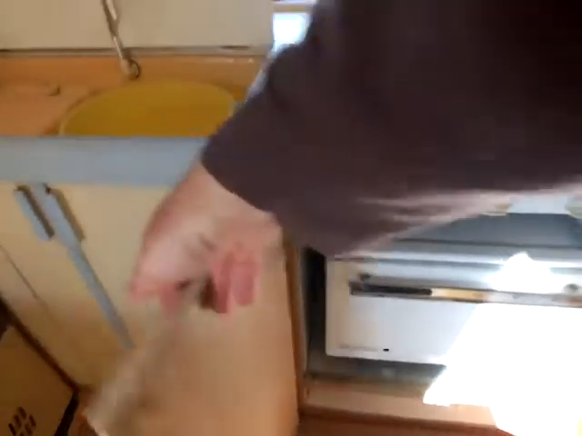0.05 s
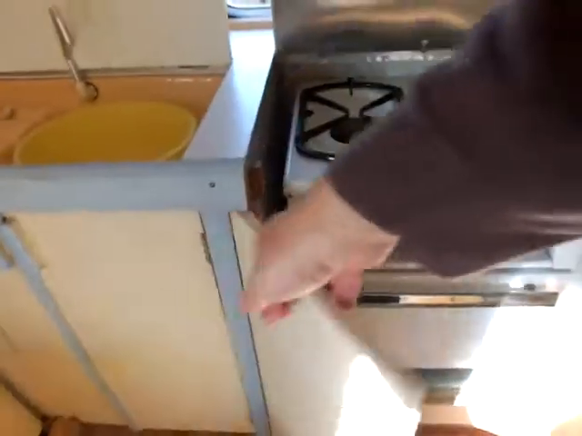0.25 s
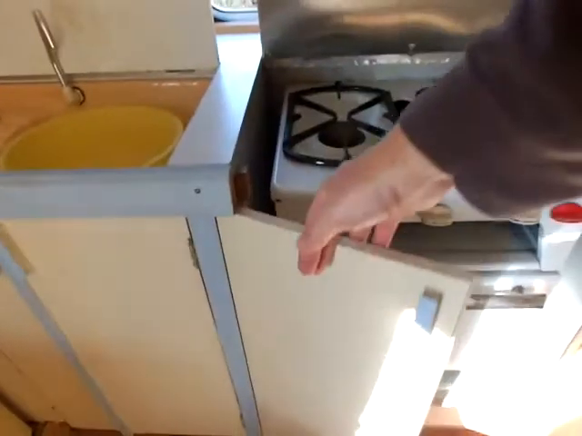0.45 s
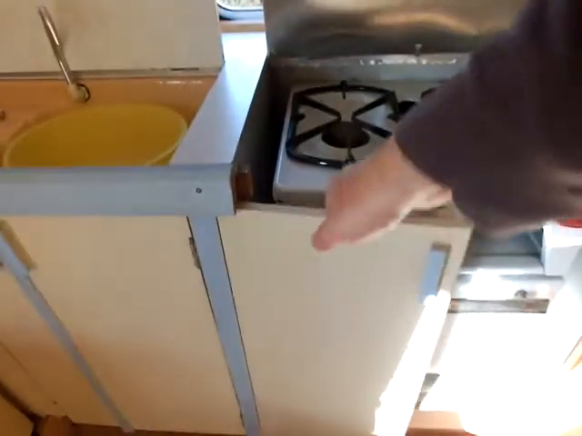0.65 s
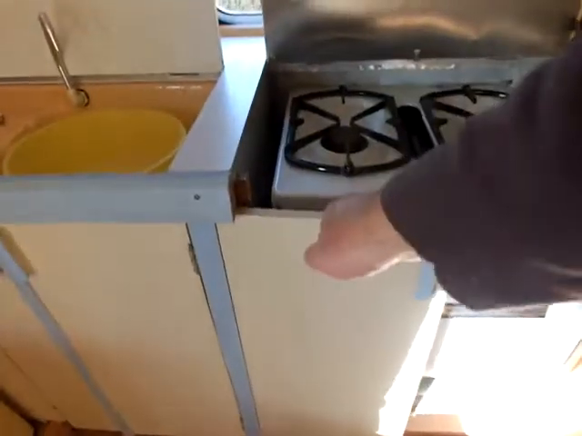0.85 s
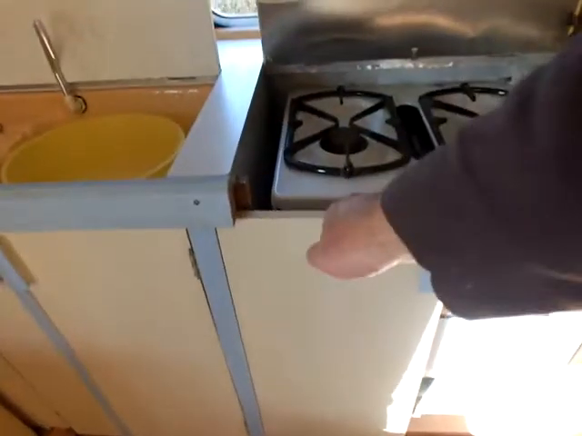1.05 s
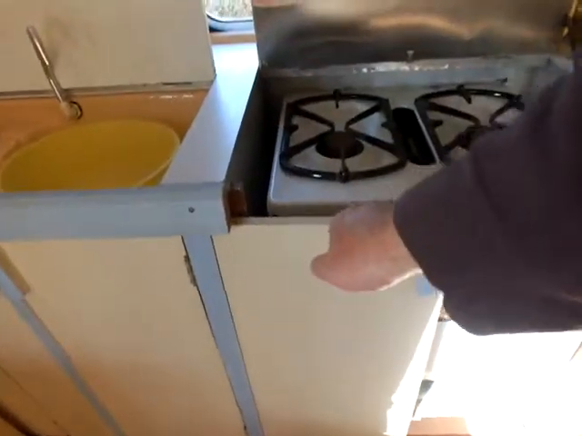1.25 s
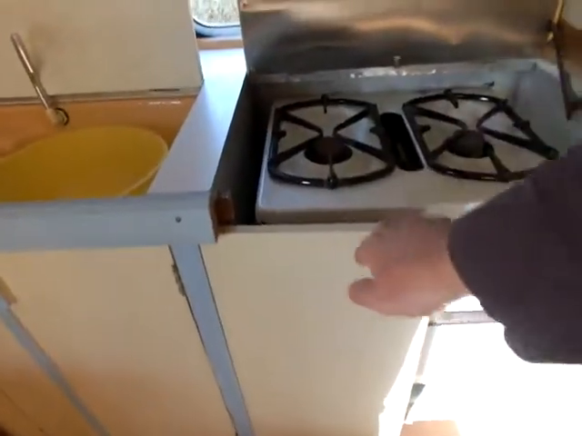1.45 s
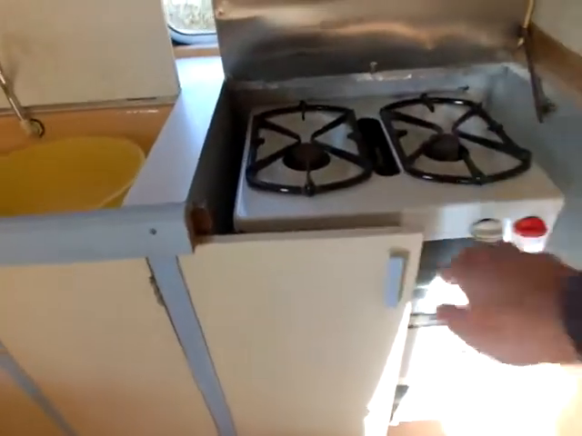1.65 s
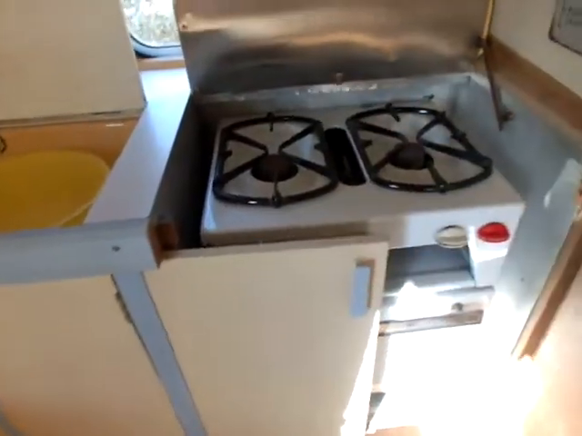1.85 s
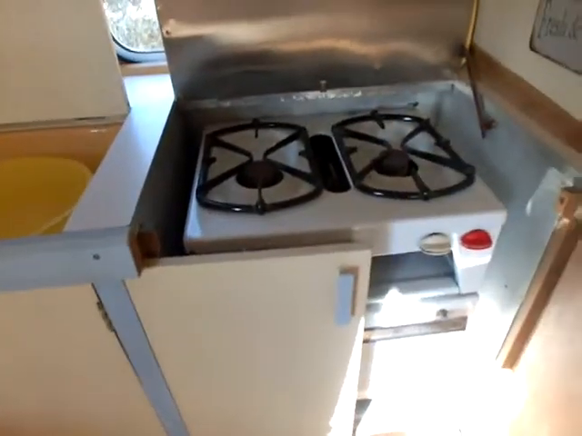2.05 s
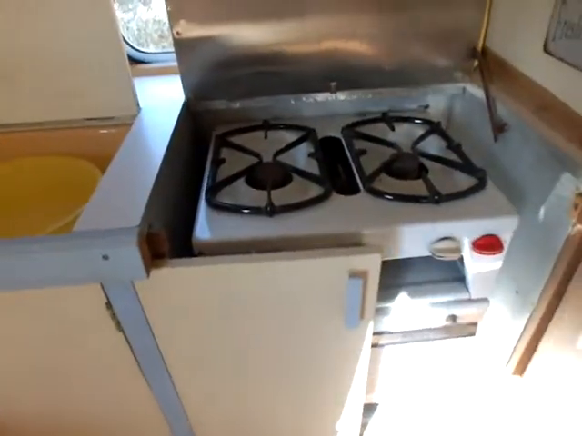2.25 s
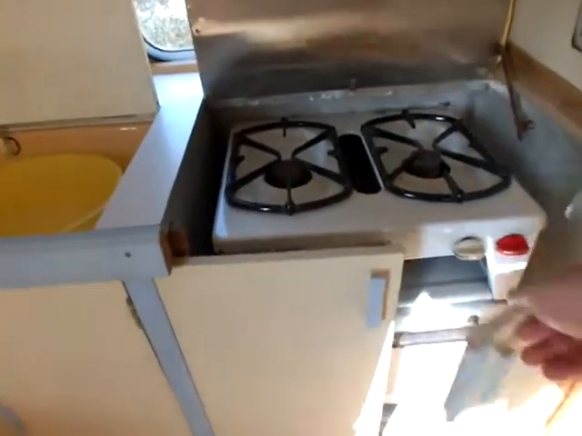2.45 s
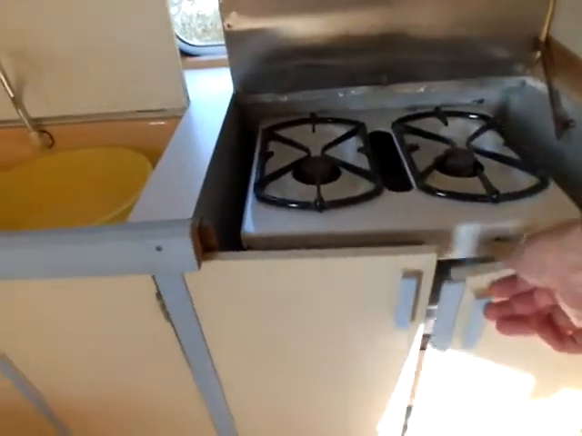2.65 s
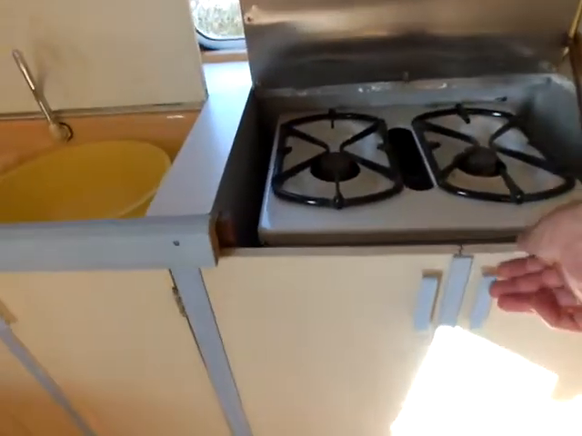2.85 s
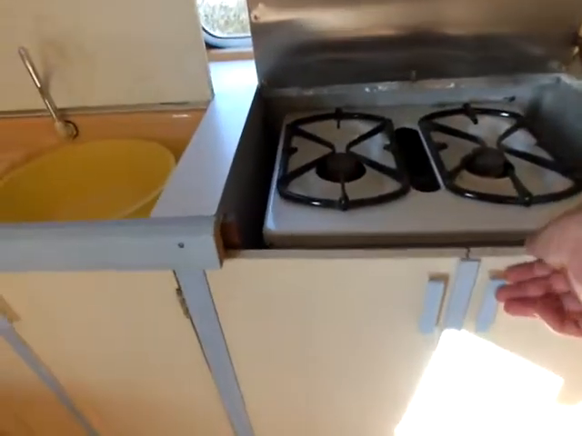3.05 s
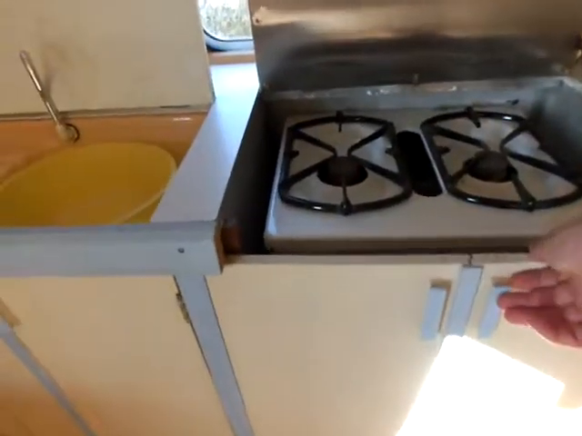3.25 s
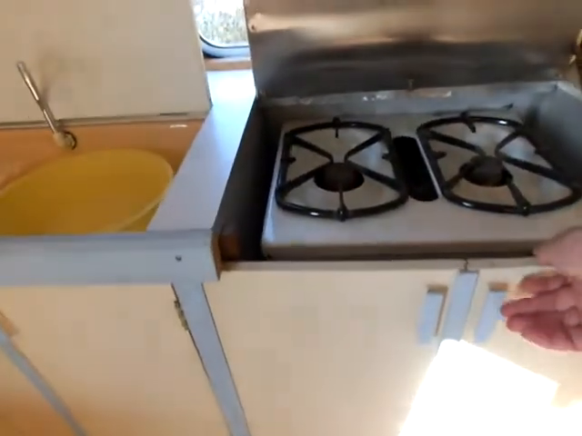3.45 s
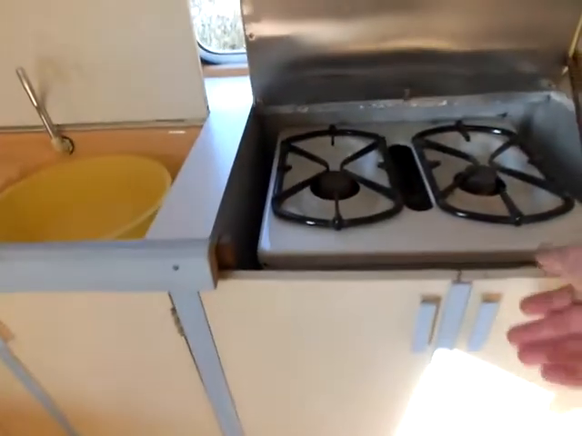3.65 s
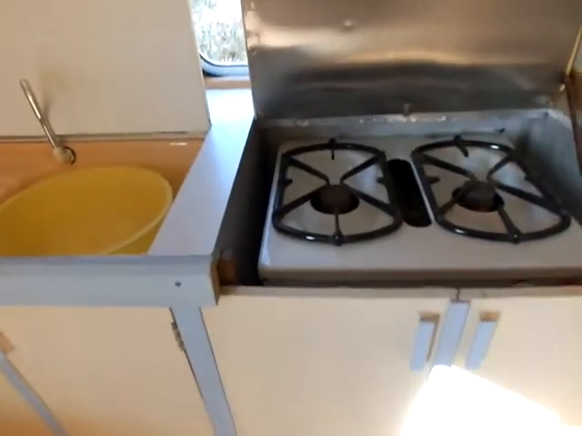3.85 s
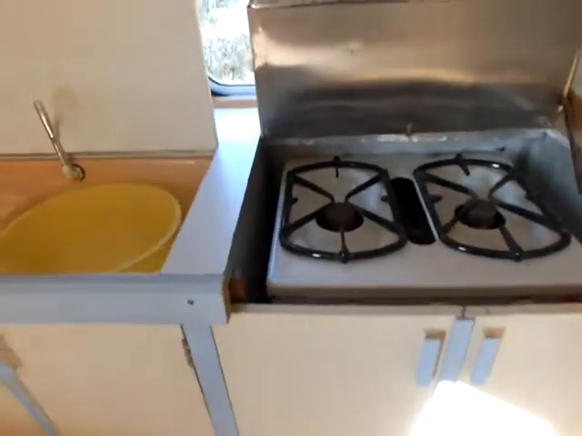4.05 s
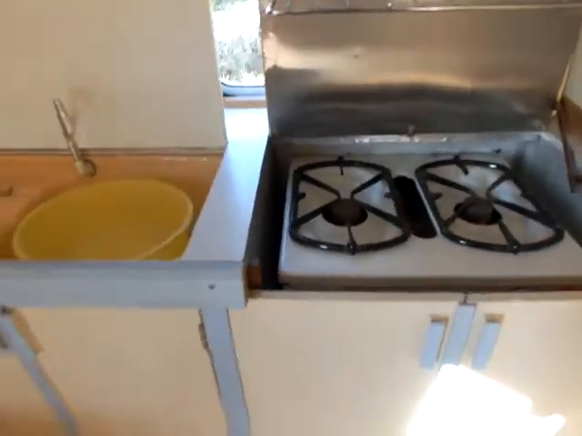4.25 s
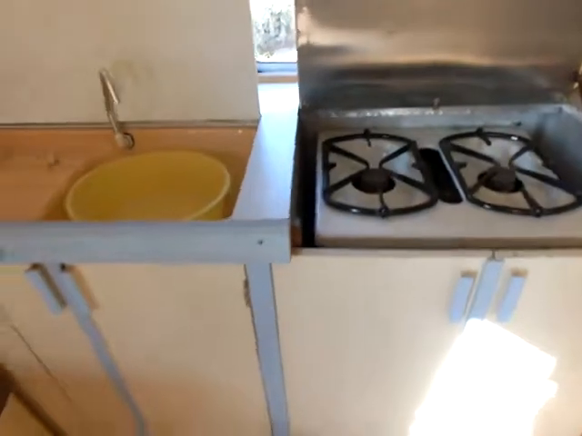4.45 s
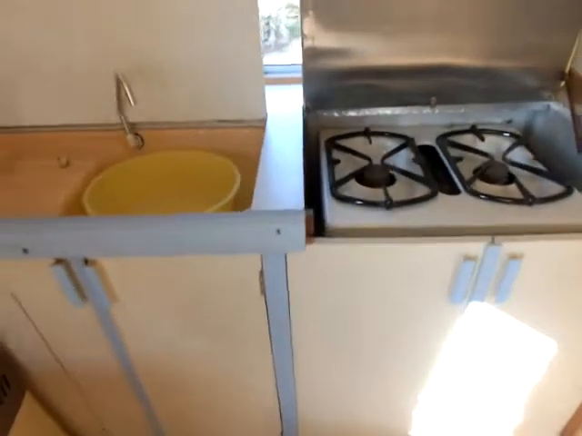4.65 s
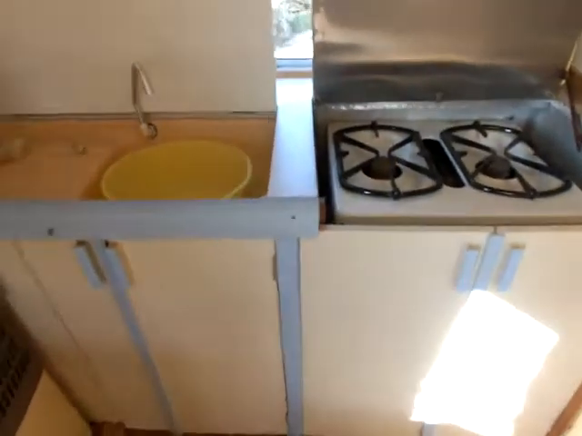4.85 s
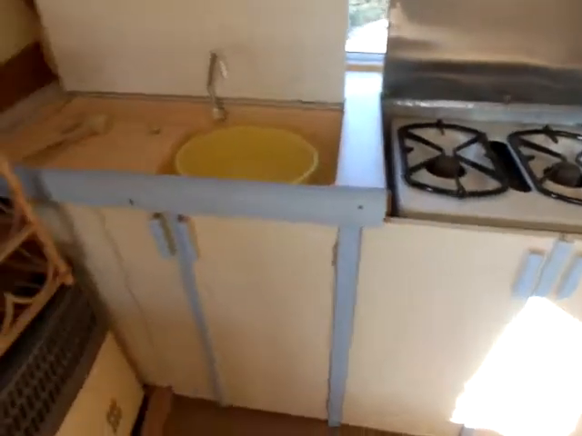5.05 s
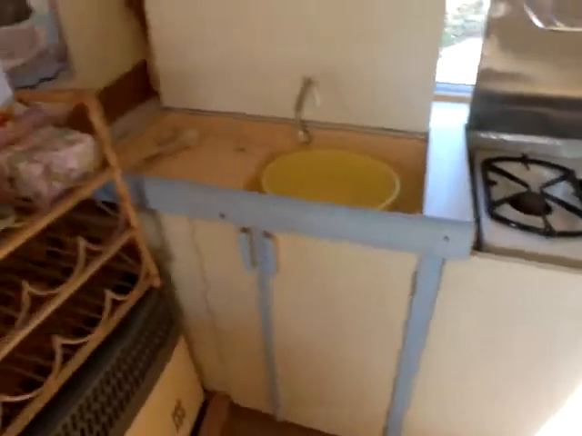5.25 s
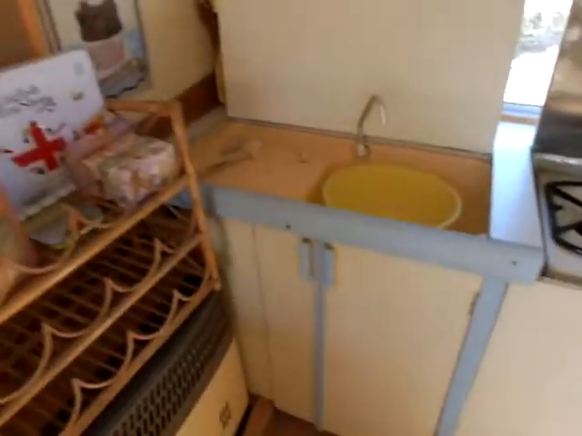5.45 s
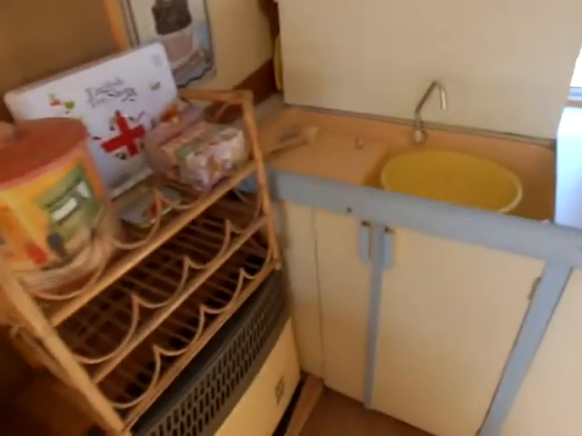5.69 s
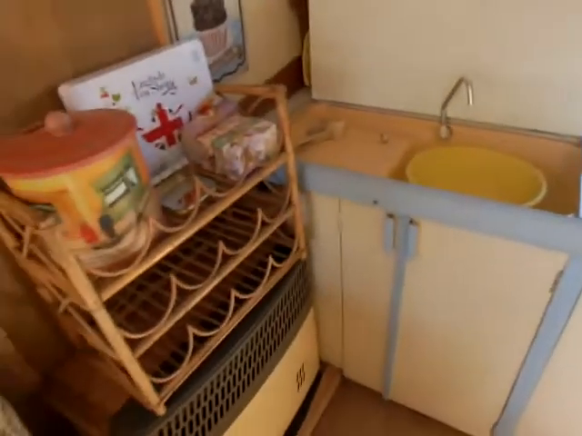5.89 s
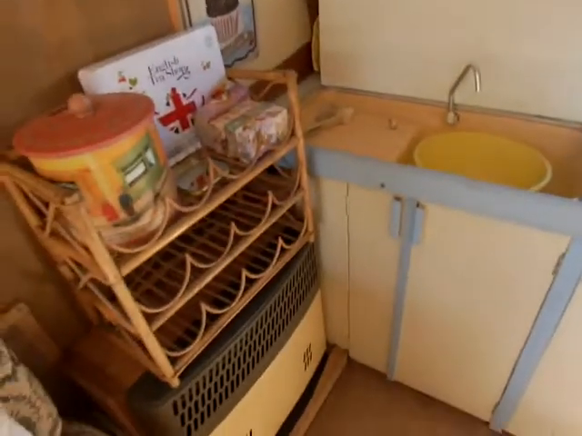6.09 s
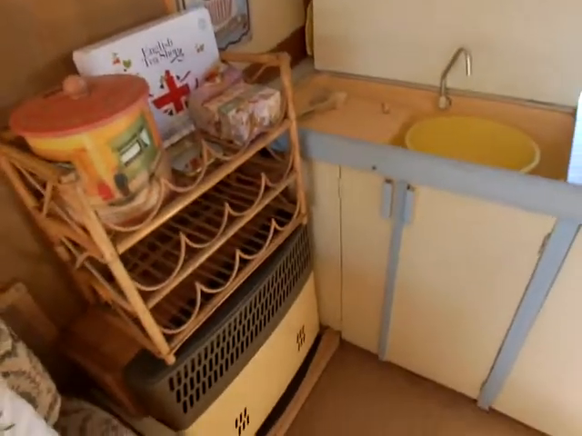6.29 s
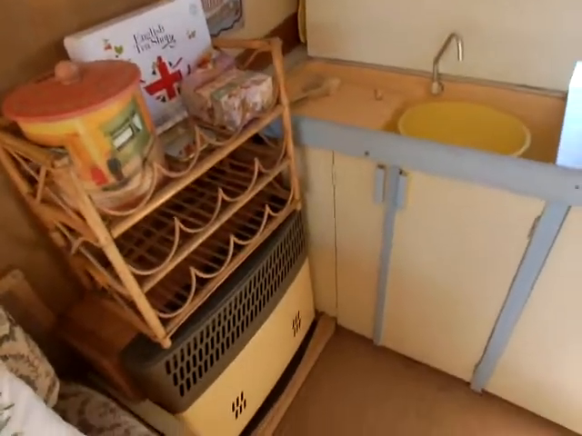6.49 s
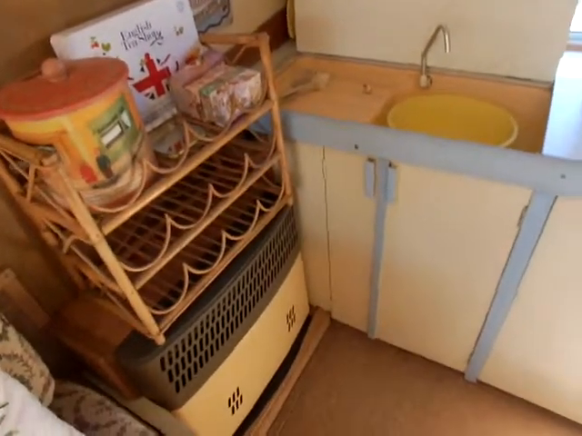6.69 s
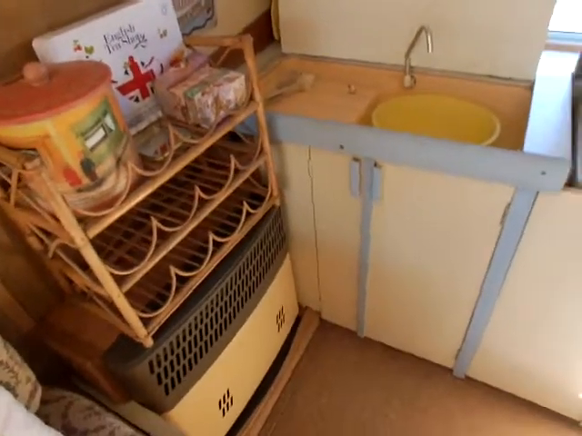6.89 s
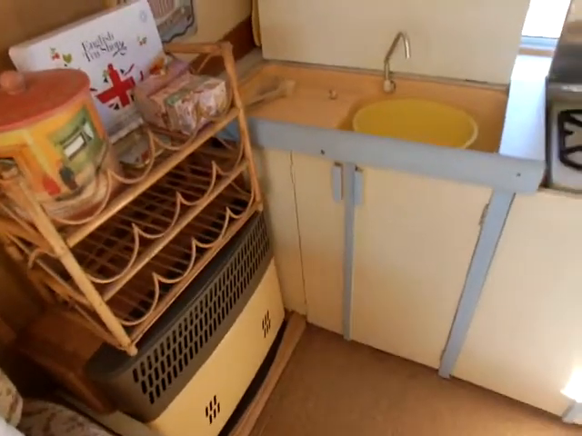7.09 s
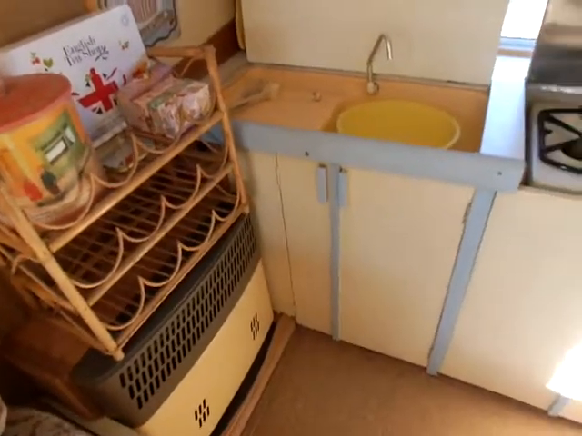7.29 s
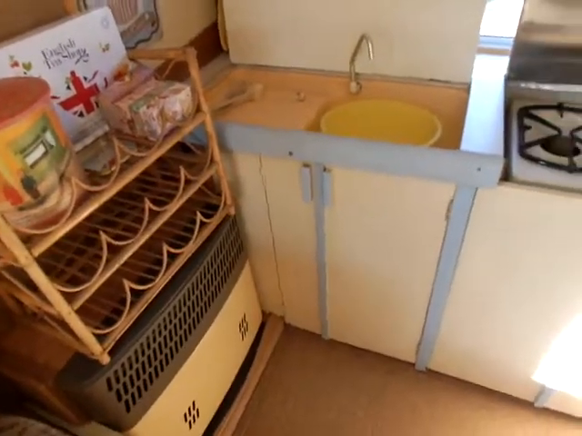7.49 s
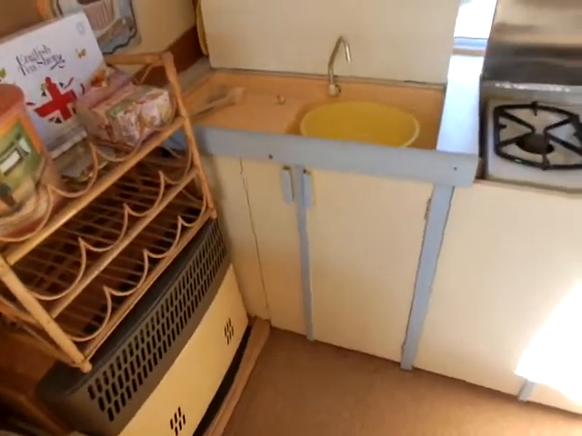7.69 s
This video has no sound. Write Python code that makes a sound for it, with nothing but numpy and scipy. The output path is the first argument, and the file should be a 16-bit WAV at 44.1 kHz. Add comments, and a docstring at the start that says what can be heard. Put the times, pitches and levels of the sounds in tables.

```python
"""Caravan cupboard doors

Two plywood doors under a stove are pushed shut by hand: the left bangs and rebounds, the right shuts in one main knock.
Each blow is shaped noise (crack, clatter) plus decaying sines for the door panel and, faintly, the stove.
Filtered noise makes the hinges, taps, sleeve ticks, rubbing, scuffs and rustle; two dry snaps and a bumped door also ring.
The small furnished cabin answers briefly; a hand-held camera listens over a soft steady rush with a thin whine."""
import sys
import numpy as np
from scipy import signal
from scipy.fft import rfft, irfft, next_fast_len
from scipy.io import wavfile
from scipy.ndimage import uniform_filter1d, map_coordinates

SR = 44100
rng = np.random.default_rng(int(sys.argv[2]) if len(sys.argv) > 2 else 0)


def transcribe(signal):
    """Save signal, clipped to [-1, 1], as a 16-bit WAV file at the path in sys.argv[1]."""
    frames = np.atleast_2d(signal).T
    limited = np.clip(frames, -1, 1)
    pcm = np.round(limited * 32767).astype(np.int16)
    wavfile.write(sys.argv[1], SR, pcm)


N = 340893
T_S = np.arange(SR) / SR
FREQ_HZ = np.fft.rfftfreq(SR, 1 / SR)
SIDES = np.array([[.5], [-.5]])  # left, right
TOP_HZ = 15850

# All event and mode levels are relative, before the mix gains.
# cabin rush, spectrum shape: (frequency [Hz], density [dB per Hz])
AIR_SPECTRUM = [(15, -42.5), (25, -11), (55, -7.5), (86, -8.5), (144, -6.5), (253, -3.5), (297, -6),
                (399, -5.5), (1270, -12), (1710, -14), (2630, -16.5), (11200, -31), (15500, -38.5)]
# rush level: (time [s], level [dB])
AIR_LEVEL = [(0, -53), (1.8, -52), (3.6, -51.5), (5.5, -51), (6.5, -53.5), (7.7, -54)]
# left-right likeness of the rush: (frequency [Hz], correlation [-])
AIR_ALIKE = [(60, 0.52), (180, 0.08), (550, 0.23), (1650, 0.097), (4970, 0.045), (15000, 0.2)]
# left-right likeness of all other sounds: (frequency [Hz], correlation [-])
HIT_ALIKE = [(100, 0.99), (400, 0.99), (750, 0.85), (1400, 0.84), (2800, 0.31), (6000, 0.027)]
# balance of all but the air: (frequency [Hz], left minus right [dB])
LEAN = [(100, 1.3), (1400, 0), (2800, -2), (6000, -1), (12000, -4.5)]

# clothes' rustle while turning away: (time [s], level [dB])
RUSTLE_LEVEL = [(4, -67), (4.55, -53.5), (4.85, -62), (5.35, -58), (6.1, -65), (6.43, -58), (6.7, -66)]
RUSTLE_EDGE_HZ, RUSTLE_FALL_DB_PER_OCT = 1860, 9
# hand slides over a door: (peak time [s], rise [s], level [dB], low edge [Hz])
RUBS = [(0, 0.17, -51.5, 101), (.685, 0.045, -47.5, 2200), (1.42, 0.053, -52, 865),
        (2.355, .035, -53, 2000), (2.48, 0.087, -55, 1800), (3.735, .018, -52.5, 700)]
RUB_FALL_PER_RISE, RUB_FALL_DB_PER_OCT = 1.7, 5  # the first is fall time over rise time
# shoes scuff on the floor: (peak time [s], level [dB])
SCUFFS = [(5.463, -53), (5.575, -52.5)]
SCUFF_S, SCUFF_EDGE_HZ, SCUFF_FALL_DB_PER_OCT = 0.025, 1840, 27

# dull thuds through the floor: (time [s], level [dB], low edge [Hz])
THUDS = [(1.374, -52.5, 90), (2.085, -44, 50), (5.304, -51.5, 35)]
THUD_FALL_DB_PER_OCT, THUD_CUT_HZ, THUD_T60_S = 6.5, 310, 0.99
# soft knocks on the woodwork; the faint bright ones at 4.93 and 5.963 s are ticks of a creasing sleeve:
# (time [s], level [dB], low edge [Hz])
SOFT_TAPS = [(3.77, -37.5, 332), (4.042, -40.5, 540), (4.411, -41, 507), (4.93, -51, 2700),
             (5.304, -41.5, 516), (5.485, -44.5, 1590), (5.963, -49, 2100)]
SOFT_TAP_FALL_DB_PER_OCT, SOFT_TAP_CUT_HZ, SOFT_TAP_T60_S = 12.5, 2800, 0.083
# hard clicks of catch and handle: (time [s], level [dB], low edge [Hz], cut-off [Hz])
CLICKS = [(1.379, -35, 5500, 13000), (2.111, -25.5, 1130, 12000), (2.2078, -26.5, 750, 5200),
          (3.448, -35, 900, 15000), (4.607, -45, 6000, 15000)]
CLICK_FALL_DB_PER_OCT = 5
# ring time at the reference level; it doubles with each doubling step in level
CLICK_T60_S, CLICK_REF_DB, CLICK_DOUBLING_DB = .105, -25.5, 11
# dry snaps: (time [s], level [dB], low edge [Hz], cut-off [Hz], t60 [s], ring level [dB])
SNAPS = [(5.8377, -26.5, 4850, 13100, 0.1, -37), (6.6167, -34.5, 5660, 10000, 0.12, -35)]
# ring of the small snapping part: (frequency [Hz], level [dB], t60 [s])
SNAP_MODES = [(1403, -10.5, 0.15), (3570, -6, 0.062), (4200, -8, 0.11), (5430, 7, 0.028),
              (5970, -3.5, 0.087), (7240, 8.5, 0.032), (8500, 1, 0.056), (9800, -1, 0.073),
              (13470, -8, .06)]

# bump on the open door: (time [s], level [dB])
BUMPS = [(1.977, -22.5)]
# modes of the open door: (frequency [Hz], level [dB], t60 [s])
OPEN_DOOR_MODES = [(264, -7, 0.25), (306, -9.5, 0.18), (336, -11, 0.33), (396, -6, 0.089),
                   (466, -4.5, 0.19), (533, 1.5, 0.14), (670, -18, .12), (877, -7.5, 0.17),
                   (1160, -15, .14), (1680, -16, 0.1), (1916, -16, 0.11)]
# left hinge turning: (peak time [s], rise [s], fall [s], level [dB])
LEFT_SWINGS = [(.58, 0.057, 0.067, -54.5), (.68, .025, .07, -41)]
# right hinge turning: (peak time [s], rise [s], fall [s], level [dB])
RIGHT_SWINGS = [(2.44, 0.033, 0.036, -48), (2.602, 0.0071, 0.019, -50), (3.41, 0.018, 0.062, -56.5)]
# left door resonances driven by its hinge: (frequency [Hz], width [Hz], level [dB])
LEFT_HINGE_PEAKS = [(950, 160, -2), (1835, 130, -3.5), (2640, 120, -7), (3150, 110, -10.5), (3540, 37, -7),
                    (4770, 51, -23)]
# right door resonances driven by its hinge: (frequency [Hz], width [Hz], level [dB])
RIGHT_HINGE_PEAKS = [(1110, 39, 1), (1445, 94, -1), (1864, 33, 0), (2740, 60, -4)]

# sheet-metal stove modes: (frequency [Hz], level [dB], t60 [s])
STOVE_MODES = [(232, -41, 1.32), (290, -43, 1.32), (307.3, -51.5, 2.97), (710, -41.5, 0.66),
               (788, -50, 1.37), (1125, -54, 0.8), (1400, -64, .6), (1880, -48, 0.89), (2310, -46, 0.67),
               (2620, -57.5, 0.84)]
# left panel modes: (frequency [Hz], level [dB], t60 [s])
LEFT_DOOR_MODES = [(69.9, -30, 0.69), (106, -23.5, 0.28), (160.3, -23, 0.42), (205.8, -27, 0.55),
                   (222, -25.5, 0.25), (262.6, -16, 0.27), (293, -20.5, 0.21), (321.3, -20, 0.25),
                   (358, -18.5, 0.094), (411.4, -20.5, 0.25), (494, -29, 0.32), (638, -27, 0.26),
                   (862, -27, 0.15), (1170, -42, .2), (1470, -20.5, 0.073), (1597, -21, 0.048),
                   (3106, -19, 0.05)]
# right panel modes: (frequency [Hz], level [dB], t60 [s])
RIGHT_DOOR_MODES = [(60, -29, 0.58), (95.2, -32, 0.54), (106.5, -21.5, 0.26), (208.5, -18.5, 0.31),
                    (234, -22, 0.44), (308.7, -17.5, 0.26), (335, -16.5, .29), (435, -45, .2),
                    (436, -23.5, 0.2), (555, -19, 0.16), (585, -37, 0.17), (622, -27.5, 0.29),
                    (676, -21.5, 0.25), (728, -33, 0.49), (794, -35.5, 0.64), (915, -39, 0.14),
                    (1070, -30, 0.22), (1237, -18.5, 0.16), (1555, -22.5, 0.099), (1794, -17.5, 0.12),
                    (2210, -25, 0.069), (2355, -26.5, 0.074), (3410, -23, 0.074)]
# left door and frame clatter, spectrum shape: (frequency [Hz], density [dB per Hz])
LEFT_CLATTER = [(35, -49), (60, -16), (291, -6), (533, -11.5), (869, -14.5), (1120, -17.5), (1590, -15.5),
                (2470, -19), (3050, -16), (3500, -19.5), (5840, -21.5), (6870, -29.5), (15500, -30.5)]
# right door and frame clatter, spectrum shape: (frequency [Hz], density [dB per Hz])
RIGHT_CLATTER = [(35, -29), (60, 2.5), (312, -12), (889, -11.5), (1050, -12), (1230, -13), (1380, -13.5),
                 (1830, -13.5), (2200, -12), (3420, -17.5), (5080, -22), (6710, -33.5), (8470, -39),
                 (15500, -50)]
# wood decay at damping 1: (frequency [Hz], t60 [s])
WOOD_DECAY = [(100, 0.7), (300, 0.1), (700, 0.39), (1500, 0.13), (4000, 0.12), (12000, 0.051)]
# cabin decay: (frequency [Hz], t60 [s])
CABIN_DECAY = [(100, 1), (400, 0.91), (2000, 0.45), (5000, 0.3), (12000, 0.2)]
# left door meets its frame and bounces:
# (time [s], level [dB], first flight [s], loss per bounce [dB], cut-off kept per bounce [ratio])
LEFT_STRIKES = [(.7575, -14, .029, 4.5, .55), (.9825, -22, 0.05, 9, 0.025)]
# right door meets its frame and bounces:
# (time [s], level [dB], first flight [s], loss per bounce [dB], cut-off kept per bounce [ratio])
RIGHT_STRIKES = [(2.8695, -8.8, .0535, 17.4, 0.054)]
STRIKE_CUT_HZ, FLIGHT_RATIO = 16000, .53  # first contact's cut-off; each flight over the one before
RING_DB_PER_BLOW_DB = .82  # hard blows clatter more than they ring
# left door chatters in its catch: (time [s], first contact level [dB], cut-off [Hz])
LEFT_RATTLE = [(1.0585, -28, 1600)]
# right door chatters in its catch: (time [s], first contact level [dB], cut-off [Hz])
RIGHT_RATTLE = [(3.014, -39, 3000)]
RATTLE_GAP_S, RATTLE_RISE_S = 0.039, 0.0027
RATTLE_LOSS_DB = 8  # per doubling of the contact count


def amp(db):
    """Decibels to gain."""
    return 10 ** (np.asarray(db) / 20)


def unit(x):
    """Scale to rms 1."""
    return x / np.sqrt(np.mean(x ** 2) + 1e-20)


def along(points, hz):
    """(Hz, value) points read on a log frequency axis."""
    point_hz, values = np.transpose(points)
    return np.interp(np.log(hz + 1), np.log(point_hz + 1), values)


def level_curve(points, t, **ends):
    """Gain over time from (s, dB) points."""
    return amp(np.interp(t, *np.transpose(points), **ends))


def add(out, at_s, x):
    """Mix x into out from at_s."""
    i = max(round(at_s * SR), 0)
    out[:, i:i + x.shape[-1]] += x[..., :N - i]


def filtered(x, gain):
    """x times a gain that depends on frequency."""
    size = next_fast_len(x.shape[-1] + SR // 8)
    spectrum = rfft(x, size) * gain(np.fft.rfftfreq(size, 1 / SR))
    return irfft(spectrum, size)[..., :x.shape[-1]]


def soft(hz, cut_hz):
    """A soft contact loses 12 dB an octave above its cut-off."""
    return (1 + (hz / cut_hz) ** 4) ** -.5


def hump(hz, edge_hz, fall_db):
    """A steep rise to an edge, then a steady fall of fall_db per octave."""
    rise = soft(edge_hz, hz + 1)
    return rise * amp(fall_db * np.log2(soft(hz, edge_hz)) / 2)


def fade(t60_s, t=T_S):
    """Exponential decay by 60 dB in t60_s."""
    return np.exp(-np.log(1000) * t / t60_s)


def pair(alike, size):
    """White noise at two microphones with a set correlation per frequency."""
    def mid_side(hz):
        angle = np.arccos(np.clip(along(alike, hz), -1, 1)) / 2
        return np.array([np.cos(angle), np.sin(angle)])
    mid, side = filtered(rng.standard_normal((2, size)), mid_side)
    return np.array([mid + side, mid - side])


def coloured(x, gain):
    """Minimum-phase colouring of a burst of up to 1 s; keeps the power of white noise."""
    cepstrum = irfft(np.log(np.maximum(unit(gain), 1e-5)))
    fold = np.r_[1, np.full(SR // 2 - 1, 2), np.zeros(SR // 2)]  # makes it causal
    return irfft(rfft(x, SR) * np.exp(rfft(cepstrum * fold)))


def ring(modes, swell_cycles, scatter_db, wander_rad=0.7):
    """Decaying modes swell over some cycles; high ones reach the two microphones out of step."""
    out = np.zeros((2, SR))
    draws = rng.standard_normal((len(modes), 2))
    for (hz, db, t60_s), (size, skew) in zip(modes, draws):
        t = T_S[T_S < t60_s]
        unlike = np.sqrt(1 - np.clip(along(HIT_ALIKE, hz), 0, 1))
        shift = skew * unlike * np.array([[1], [-1]])
        swell = 1 - np.exp(-t * hz / swell_cycles)
        # loose joints make the phase wander, which roughens each line
        drift = np.interp(t, np.linspace(0, 1, 60), rng.standard_normal(60))
        phase = rng.uniform(0, 2 * np.pi) + wander_rad * drift
        tone = np.sin(2 * np.pi * hz * t + shift + phase)
        out[:, :len(t)] += amp(db + scatter_db * size) * swell * fade(t60_s, t) * tone
    return out


def tick(gain, t60_s, direct, rise_s=0.00079):
    """A tiny contact: a direct spike, then dense reflections building up from the close walls."""
    t = T_S[T_S < t60_s]
    x = pair(HIT_ALIKE, len(t)) * fade(t60_s, t) * (1 - np.exp(-t / rise_s))
    x[:, 0] += direct
    return coloured(x, gain)


def stroke(peak_s, rise_s, fall_s, gain, grain_db, grain_hz=300):
    """Start time and sound of one swell of friction, its level uneven at the grain rate."""
    t = np.arange(max(peak_s - 3 * rise_s, 0), peak_s + 3 * fall_s, 1 / SR)
    uneven = map_coordinates(rng.standard_normal(len(t)), [(t - t[0]) * grain_hz], mode="mirror")
    hiss = unit(filtered(amp(grain_db * uneven) * pair(HIT_ALIKE, len(t)), gain))
    swell = np.exp(-((t - peak_s) / np.where(t < peak_s, rise_s, fall_s)) ** 2)
    return t[0], swell * hiss


def air(whine_hz=11041, whine_db=-82):
    """Steady noise rush in the cabin and the camera's thin electronic whine, a sine."""
    t = np.arange(N) / SR
    rush = unit(filtered(pair(AIR_ALIKE, N), lambda hz: amp(along(AIR_SPECTRUM, hz))))
    whine = unit(np.sin(2 * np.pi * whine_hz * t))
    return level_curve(AIR_LEVEL, t) * rush + amp(whine_db) * whine


def rustle(fold_db=3.0, folds_per_s=35):
    """Clothes rustle in small uneven catches as the body turns."""
    t = np.arange(N) / SR
    uneven = map_coordinates(rng.standard_normal(SR // 8), [t * folds_per_s], mode="mirror")
    hiss = filtered(pair(HIT_ALIKE, N), lambda hz: hump(hz, RUSTLE_EDGE_HZ, RUSTLE_FALL_DB_PER_OCT))
    cloth = unit(amp(fold_db * uneven) * hiss)
    return level_curve(RUSTLE_LEVEL, t, left=-np.inf, right=-np.inf) * cloth


def rubs():
    """Friction noise as a hand slides over the woodwork and shoes scuff the floor."""
    out = np.zeros((2, N))
    for peak_s, rise_s, db, edge_hz in RUBS:
        start_s, hiss = stroke(peak_s, rise_s, RUB_FALL_PER_RISE * rise_s,
                               lambda hz: hump(hz, edge_hz, RUB_FALL_DB_PER_OCT), grain_db=1.5)
        add(out, start_s, amp(db) * hiss)
    for peak_s, db in SCUFFS:
        start_s, hiss = stroke(peak_s, SCUFF_S, SCUFF_S,
                               lambda hz: hump(hz, SCUFF_EDGE_HZ, SCUFF_FALL_DB_PER_OCT), grain_db=5.5)
        add(out, start_s, amp(db) * hiss)
    return out


def taps():
    """Hard clicks ring longer the harder they are; thuds share one softness and decay, as do soft taps."""
    out = np.zeros((2, N))
    for at_s, db, edge_hz in THUDS:
        gain = hump(FREQ_HZ, edge_hz, THUD_FALL_DB_PER_OCT) * soft(FREQ_HZ, THUD_CUT_HZ)
        add(out, at_s, amp(db) * tick(gain, THUD_T60_S, direct=1))
    for at_s, db, edge_hz in SOFT_TAPS:
        gain = hump(FREQ_HZ, edge_hz, SOFT_TAP_FALL_DB_PER_OCT) * soft(FREQ_HZ, SOFT_TAP_CUT_HZ)
        add(out, at_s, amp(db) * tick(gain, SOFT_TAP_T60_S, direct=1))
    for at_s, db, edge_hz, cut_hz in CLICKS:
        t60_s = min(CLICK_T60_S * 2 ** ((db - CLICK_REF_DB) / CLICK_DOUBLING_DB), 1)
        gain = hump(FREQ_HZ, edge_hz, CLICK_FALL_DB_PER_OCT) * soft(FREQ_HZ, cut_hz)
        add(out, at_s, amp(db) * tick(gain, t60_s, direct=0.87))
    return out


def snaps():
    """Something small and hard snaps twice, with a short bright ring."""
    out = np.zeros((2, N))
    for at_s, db, edge_hz, cut_hz, t60_s, ring_db in SNAPS:
        bright = hump(FREQ_HZ, edge_hz, fall_db=5.0)
        body = amp(-7.5) * hump(FREQ_HZ, edge_hz=1350, fall_db=16)
        snap = tick((bright + body) * soft(FREQ_HZ, cut_hz), t60_s, direct=2.4)
        tail = ring(SNAP_MODES, swell_cycles=1.9, scatter_db=1.5)
        add(out, at_s, amp(db) * snap + amp(ring_db) * tail)
    return out


def bump(knock_db=-8.5, thud_db=-21, scrape_db=-15):
    """The open door is bumped: it knocks, rings hollow, shakes its frame and scrapes briefly."""
    out = np.zeros((2, N))
    for at_s, db in BUMPS:
        knock_gain = hump(FREQ_HZ, edge_hz=470, fall_db=9) * soft(FREQ_HZ, cut_hz=3400)
        knock = tick(knock_gain, t60_s=0.36, direct=0.86)
        thud = tick(soft(FREQ_HZ, THUD_CUT_HZ), THUD_T60_S, direct=1)
        hollow = ring(OPEN_DOOR_MODES, swell_cycles=0.79, scatter_db=1.5)
        add(out, at_s, amp(db) * (hollow + amp(knock_db) * knock + amp(thud_db) * thud))
        start_s, scrape = stroke(at_s + .006, rise_s=.003, fall_s=0.064,
                                 gain=lambda hz: hump(hz, edge_hz=970, fall_db=2.5), grain_db=2.5)
        add(out, start_s, amp(db + scrape_db) * scrape)
    return out


def hinge(swings, peaks):
    """A dry hinge grinds: friction noise through the resonances of its door."""
    def body(hz):
        total = 0
        for k, (centre_hz, width_hz, db) in enumerate(peaks):
            damping = 1j * hz * width_hz
            total = total + (-1) ** k * amp(db) * damping / (centre_hz ** 2 - hz ** 2 + damping)
        return total
    out = np.zeros((2, N))
    for peak_s, rise_s, fall_s, db in swings:
        start_s, grind = stroke(peak_s, rise_s, fall_s, body, grain_db=1)
        add(out, start_s, amp(db) * grind)
    return out


def stove():
    """The loose sheet metal of the stove shivers on after a blow."""
    return ring(STOVE_MODES, swell_cycles=6, scatter_db=1, wander_rad=1.1)


def clatter(gain, damping, cabin_db):
    """Crowded wood modes as noise that fades band by band, over a weak cabin tail."""
    hz, t, bands = signal.stft(pair(HIT_ALIKE, SR), SR, nperseg=256)
    wood = fade(along(WOOD_DECAY, hz)[:, None] / damping, t)
    cabin = amp(cabin_db) * fade(along(CABIN_DECAY, hz)[:, None], t)
    _, burst = signal.istft(bands * np.hypot(wood, cabin), SR, nperseg=256)
    return coloured(burst[:, :SR], gain)


def bounces(strikes, rise_s, ring_db, count=3):
    """Blows (s, dB, cut-off Hz, rise s, ring dB) of a bouncing door: each comes sooner, weaker and duller."""
    blows = []
    for at_s, db, flight_s, loss_db, kept in strikes:
        for k in range(count):
            blow_db = db - loss_db * k
            cut_hz = STRIKE_CUT_HZ * kept ** k
            blows.append((at_s, blow_db, cut_hz, rise_s, RING_DB_PER_BLOW_DB * blow_db + ring_db))
            at_s += flight_s * FLIGHT_RATIO ** k
    return blows


def rattle(starts, ring_db, unevenness=0.28, count=5):
    """Dull blows at uneven gaps that die away as the door settles."""
    blows = []
    for at_s, db, cut_hz in starts:
        for k, chance in enumerate(rng.uniform(-1, 1, count)):
            blow_db = db - RATTLE_LOSS_DB * np.log2(1 + k)
            blows.append((at_s, blow_db, cut_hz, RATTLE_RISE_S, blow_db + ring_db))
            at_s += RATTLE_GAP_S * (1 + unevenness * chance)
    return blows


def door(blows, modes, spectrum, damping, cabin_db, bass_edge_hz, swell_cycles, stove_db,
         bass_lag_s, slow_hz, crack_db, crack_s):
    """Each blow cracks, clatters in the frame, rings the panel and shakes the stove."""
    out = np.zeros((2, N))
    # in the bass the panel's separate modes take over from the clatter
    colour = amp(along(spectrum, FREQ_HZ)) * FREQ_HZ / np.hypot(FREQ_HZ, bass_edge_hz)
    # contact and nearest reflections stand crack_db above the clatter that follows
    crack = amp(crack_db * (np.exp(-(T_S / crack_s) ** 2) - 1))
    for at_s, db, cut_hz, rise_s, ring_db in blows:
        noise = clatter(colour * soft(FREQ_HZ, cut_hz), damping, cabin_db)
        add(out, at_s, amp(db) * crack * (1 - np.exp(-T_S / rise_s)) * noise)
        panel = ring(modes, swell_cycles, scatter_db=.5)
        add(out, at_s, amp(ring_db) * (panel + amp(stove_db) * stove()))
    # slow bending waves: towards the bass the delay grows to bass_lag_s, mostly below slow_hz
    return filtered(out, lambda hz: np.exp(-2j * np.pi * bass_lag_s * slow_hz * np.arctan(hz / slow_hz)))


def scene(right_lead_s=.00005):
    """Doors, reaching the right side first, and small sounds over the cabin's air."""
    left_blows = bounces(LEFT_STRIKES, rise_s=0.0018, ring_db=7.5) + rattle(LEFT_RATTLE, ring_db=0)
    right_blows = bounces(RIGHT_STRIKES, rise_s=0.00024, ring_db=11.5) + rattle(RIGHT_RATTLE, ring_db=8)
    left = door(left_blows, LEFT_DOOR_MODES, LEFT_CLATTER, damping=1.0, cabin_db=-10.5,
                bass_edge_hz=830, swell_cycles=0.88, stove_db=7.0,
                bass_lag_s=0.00373, slow_hz=303.0, crack_db=5.5, crack_s=0.0081)
    right = door(right_blows, RIGHT_DOOR_MODES, RIGHT_CLATTER, damping=1.25, cabin_db=-19.0,
                 bass_edge_hz=450, swell_cycles=3.7, stove_db=0.0,
                 bass_lag_s=0.00548, slow_hz=910, crack_db=1.0, crack_s=.012)
    hinges = hinge(LEFT_SWINGS, LEFT_HINGE_PEAKS) + hinge(RIGHT_SWINGS, RIGHT_HINGE_PEAKS)
    doors = amp(3.0) * left + amp(-1.5) * right + hinges
    doors = filtered(doors, lambda hz: np.exp(-2j * np.pi * hz * right_lead_s * SIDES))
    near = doors + taps() + bump() + snaps() + rubs() + rustle()
    near = filtered(near, lambda hz: amp(along(LEAN, hz) * SIDES))
    return near + air() * amp(0.92 * SIDES)


def record(dry, limit_db=-6.5, recovery_db_per_s=7, duck_ratio=.7):
    """The camera ducks its gain on loud peaks, recovers slowly and keeps nothing above its band limit."""
    over_db = np.maximum(20 * np.log10(np.abs(dry).max(axis=0) + 1e-9) - limit_db, 0)
    # held peak excess, falling at recovery_db_per_s before duck_ratio scales it
    recovery_db = recovery_db_per_s * np.arange(N) / SR
    held_db = np.maximum.accumulate(over_db + recovery_db) - recovery_db
    duck_db = duck_ratio * uniform_filter1d(held_db, size=128)
    return filtered(dry * amp(-duck_db), lambda hz: np.clip((TOP_HZ - hz) / 200 + .5, 0, 1))


dry = scene()
out = record(dry)
transcribe(out)
```